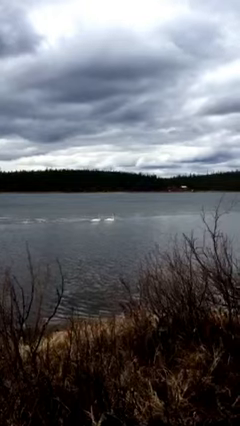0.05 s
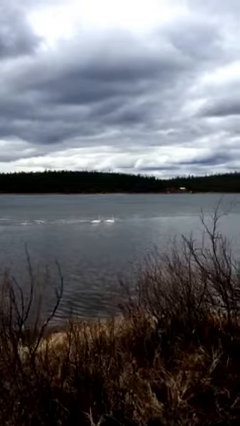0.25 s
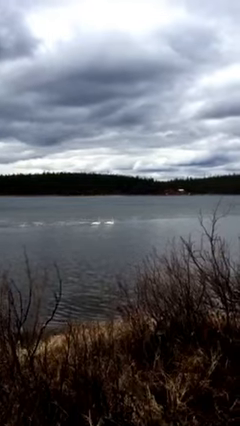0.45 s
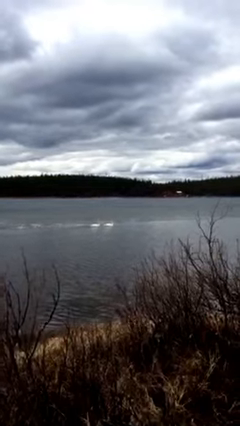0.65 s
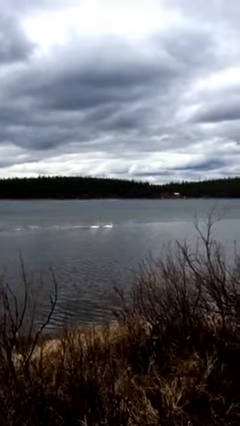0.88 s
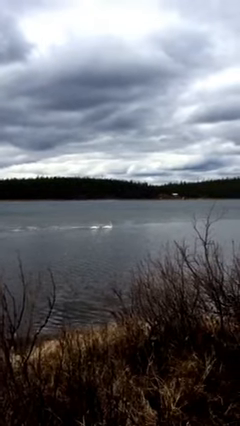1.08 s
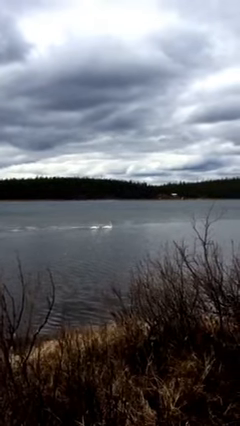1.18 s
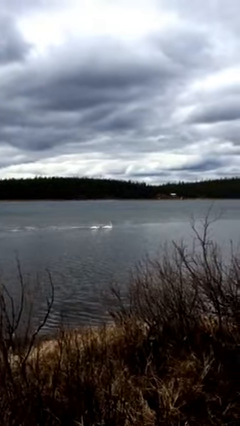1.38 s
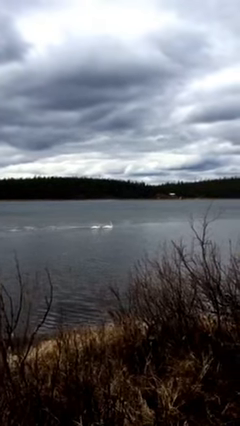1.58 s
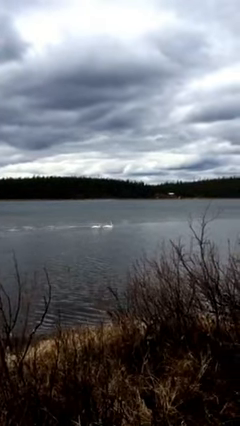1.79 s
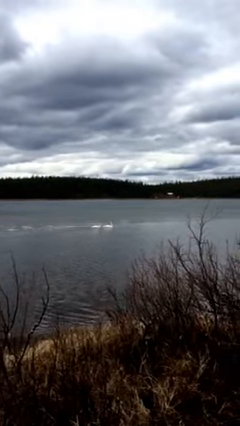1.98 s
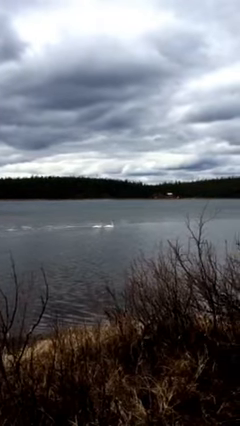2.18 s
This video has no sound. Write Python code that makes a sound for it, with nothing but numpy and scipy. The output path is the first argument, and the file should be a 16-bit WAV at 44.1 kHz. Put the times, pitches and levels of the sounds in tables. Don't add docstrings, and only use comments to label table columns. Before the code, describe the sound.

A distant swan honks once at about 1.6 seconds, barely a tenth of a second long: a low nasal start cracks and jumps to a clear higher note that dips, with a hollow ring and faint lake echo. Earlier, deep fluttering wind buffets hit the microphone from 0.2 to 0.8, strongest near 0.7; tiny bubbles trickle around 0.2-0.5. More thumps come at 1.75-2.0, with faint twig rustle over steady soft hiss.

```python
import sys
import numpy as np
from scipy import signal
from scipy.io import wavfile
from scipy.ndimage import uniform_filter1d

SR = 44100
rng = np.random.default_rng(int(sys.argv[2]) if len(sys.argv) > 2 else 0)


def dump(signal):
    limited = np.clip(np.atleast_2d(signal).T, -1, 1)
    pcm = np.round(limited * 32767).astype(np.int16)
    wavfile.write(sys.argv[1], SR, pcm)


def amplitude_ratio(level_db):
    exponent = np.asarray(level_db, float) / 20
    return 10 ** exponent


N = 99225


def evened(x):
    return x / np.sqrt(np.mean(x ** 2) + 1e-20)


def add(mix, s, sound):
    part = mix[max(round(s * SR), 0):][:len(sound)]
    part += sound[:len(part)]


def bump(t, length):
    return .5 ** ((2 * t / length) ** 2)


def resonate(x, hz, width_hz):
    turn = np.exp(2j * np.pi * np.cumsum(hz * np.ones(len(x))) / SR)
    r = np.exp(-np.pi * width_hz / SR)
    smooth = signal.lfilter([(1 - r) ** 2], [1, -2 * r, r * r], x / turn)
    return 2 * (turn * smooth).real


def voice(curve, partials):
    waver_db = .5
    s, *columns = np.transpose(curve)
    t = np.arange(s[0], s[-1], 1 / SR)
    hz, effort_db, first_db = (uniform_filter1d(np.interp(t, s, v), size=130) for v in columns)
    turns = 2 * np.pi * np.cumsum(hz) / SR
    drift = rng.standard_normal((len(partials), len(t)))
    for _ in range(2):
        drift = uniform_filter1d(drift, size=200)
    drift = waver_db * evened(drift)
    tone = np.zeros(len(t))
    for i, (multiple, db, share) in enumerate(partials):
        level = first_db if i == 0 else share * effort_db
        tone += amplitude_ratio(db + level + drift[i]) * np.sin(multiple * turns)
    return s[0], tone * signal.windows.tukey(len(t), .03)


# (time [s], pitch [Hz], effort [dB], first partial [dB])
LOW_START = [(1.5668, 324, -36, -34), (1.576, 312, -20, -14), (1.586, 301, -13, -4), (1.594, 298, -6, -3),
             (1.601, 297, 1, -1), (1.609, 293, -6, 0), (1.617, 290, -16, -4), (1.628, 290, -32, -22)]
# (multiple of the pitch, level [dB], share of the effort followed)
LOW_START_PARTIALS = [
    (1, -56, 0),
    (2, -50, 1),
    (3, -66, 1),
]
# (time [s], pitch [Hz], effort [dB], first partial [dB])
CLEAR_NOTE = [(1.6065, 392, -14, -20), (1.611, 395, -2, -6), (1.618, 397, -.5, 1), (1.63, 398.5, 0, -6),
              (1.65, 395.5, -.7, 2), (1.664, 386, -1.8, -1), (1.676, 369, -3.5, -6), (1.683, 349, -21, -2),
              (1.72, 332, -62, -24)]
# (multiple of the pitch, level [dB], share of the effort followed)
CLEAR_NOTE_PARTIALS = [
    (1, -56.5, 0),
    (2, -39.8, 1),
    (3, -62.5, .8),
    (6, -83, 5.5),
    (8, -89, 5.5),
]
# (pitch [Hz], level [dB], time to fall 60 dB [s])
WINDPIPE_TONES = [(516, -50, .09), (668, -38, .048), (664, -51, .22), (886, -50, .08), (998, -53, .06)]
# (time [s], level [dB])
BREAK_JOLTS = [
    (1.5951, -6),
    (1.6071, 0),
]


def swan():
    jolt_rise_s = .0025
    brass_s, brass_hz, brass_db, brass_t60_s = 1.611, 1280, -61, 0.098
    out = np.zeros(N)
    t = np.arange(8000) / SR
    add(out, *voice(LOW_START, LOW_START_PARTIALS))
    add(out, *voice(CLEAR_NOTE, CLEAR_NOTE_PARTIALS))
    rise = 1 - np.exp(-(t / jolt_rise_s) ** 2)
    ring = sum(amplitude_ratio(db - 60 * t / t60) * np.sin(2 * np.pi * hz * t) for hz, db, t60 in WINDPIPE_TONES)
    for s, db in BREAK_JOLTS:
        add(out, s, amplitude_ratio(db) * ring * rise)
    brass = amplitude_ratio(brass_db - 60 * t / brass_t60_s) * np.sin(2 * np.pi * brass_hz * t)
    add(out, brass_s, brass * rise)
    return out


def lake_echo(bird):
    echo_db, t60_s, delay_s, shore_s = -32, .6, .018, .1
    t = np.arange(SR // 2) / SR
    hits = rng.standard_normal(len(t)) * (rng.random(len(t)) < .2)
    fade = amplitude_ratio(-60 * t / t60_s - 8 * (t > shore_s))
    echoes = hits * fade * (t > delay_s)
    return amplitude_ratio(echo_db) * signal.fftconvolve(bird, echoes / np.linalg.norm(echoes))[:N]


# (time of peak [s], peak level [dB], ring pitch [Hz], length [s])
GUST_BUFFETS = [(0.194, -55, 82, 0.019), (0.223, -40.5, 71.7, 0.027), (0.255, -48.5, 57.5, 0.031),
                (0.281, -41, 59.8, 0.021), (0.305, -48, 55.96, .025), (0.356, -38.5, 58.9, 0.023),
                (0.399, -45, 56.3, 0.017), (0.445, -43, 61.55, 0.05), (.487, -40, 63.77, 0.024),
                (0.518, -47, 56.8, 0.029), (0.588, -43.5, 65.3, 0.045), (0.628, -40, 59, 0.018),
                (0.658, -34.5, 80.4, 0.016), (.686, -34.5, 79.5, 0.021), (0.715, -34.5, 61.1, 0.018),
                (0.74, -34, 56.2, 0.023), (0.764, -41.5, 58.4, 0.019), (0.804, -53.5, 69.2, 0.04),
                (0.858, -52, 73.4, 0.019)]
# (time of peak [s], peak level [dB], ring pitch [Hz], length [s])
LONE_BUFFETS = [(0.046, -63, 54.3, .035), (0.152, -62, 54, 0.023), (0.925, -53, 51.54, .029),
                (1.041, -53, 60.3, 0.014), (1.07, -55.5, 58.6, 0.017), (1.094, -50.5, 60, 0.017),
                (1.205, -56.5, 48.26, 0.05), (1.431, -56.5, 51.1, 0.033), (1.487, -66, 53.7, .025),
                (1.524, -66.5, 63.4, 0.015), (1.567, -68, 64.2, 0.025), (1.6, -58.5, 47.7, 0.028),
                (1.643, -61, 60, 0.026), (1.758, -47.5, 65.9, 0.025), (1.829, -52, 59.2, 0.021),
                (1.852, -41, 68.5, 0.017), (1.882, -51.5, 53.9, 0.031), (1.975, -38.5, 59.14, 0.029),
                (2.053, -64.5, 63, .027), (2.119, -57.5, 64, 0.016), (2.23, -71, 50.8, .03)]
# (time [s], peak level [dB], pitch [Hz])
SHARP_EDGES = [(.215, -74, 125), (0.359, -61.5, 134), (.625, -61, 148), (.655, -48, 120),
               (.69, -50.5, 161.4), (0.709, -45.5, 130), (0.752, -57.5, 150), (.855, -66, 145.5),
               (1.09, -69, 125), (1.5, -68.5, 169.7), (1.85, -55, 140.7), (1.968, -55.5, 150)]


def wind():
    sag_hz_per_s, tail_stretch = 280, 1.3
    flutter_db, flutter_power, flutter_hz, flutter_width_hz = -59.5, 2.07, 125, 71
    edge_s, low_cut_hz = 0.015, 40
    push, pull, edges = np.zeros(N), np.zeros(N), np.zeros(N)
    t = np.arange(-.04, .12, 1 / SR)
    stretch = np.where(t > 0, tail_stretch, 1 / tail_stretch)
    for s, db, hz, length in GUST_BUFFETS + LONE_BUFFETS:
        power = amplitude_ratio(2 * db) * bump(t, length * stretch) ** 2
        add(push, s + t[0], power)
        add(pull, s + t[0], power * (hz - sag_hz_per_s * t))
    ring_hz = (pull + 6e-9) / (push + 1e-10)
    ring = np.sqrt(push) * np.cos(2 * np.pi * np.cumsum(ring_hz) / SR)
    for s, db, hz in SHARP_EDGES:
        wave = np.cos(2 * np.pi * (rng.random() + hz * t))
        add(edges, s + t[0], amplitude_ratio(db) * bump(t, edge_s) * wave)
    flutter = evened(resonate(rng.standard_normal(N), flutter_hz, flutter_width_hz))
    strength = (push / push.max()) ** (flutter_power / 2)
    out = ring + edges + amplitude_ratio(flutter_db) * strength * flutter
    return signal.sosfilt(signal.butter(3, low_cut_hz, "high", fs=SR, output="sos"), out)


# (time [s], pitch [Hz], level [dB])
BUBBLES = [(0.169, 1600, -81), (.213, 1580, -80), (.252, 1705, -74.5), (.262, 1494, -75.5), (.3, 1650, -77),
           (.335, 1694, -79), (0.374, 1840, -78), (.432, 1930, -87), (0.477, 1740, -79)]
# (time [s], pitch [Hz], level [dB])
SHORE_RIPPLE = [
    (.13, 1580, -12),
    (.2, 1600, -10),
    (.27, 1630, 1.5),
    (.35, 1640, -3.5),
    (.45, 1820, -10),
    (.55, 1960, -16),
]


def water():
    bubble_s, ripple_db, ripple_width_hz = 0.014, -84, 250
    out = np.zeros(N)
    t = np.arange(-.05, .05, 1 / SR)
    for s, hz, db in BUBBLES:
        tone = np.sin(2 * np.pi * hz * (t + 0.61 * t ** 2))
        add(out, s + t[0], amplitude_ratio(db) * bump(t, bubble_s) * tone)
    s, hz, db = np.transpose(SHORE_RIPPLE)
    t = np.arange(s[0], s[-1], 1 / SR)
    ripple = evened(resonate(rng.standard_normal(len(t)), np.interp(t, s, hz), ripple_width_hz))
    add(out, s[0], amplitude_ratio(ripple_db + np.interp(t, s, db)) * ripple)
    return out


# (time of peak [s], pitch [Hz], width [Hz], level [dB], length [s])
TWIG_SWELLS = [
    (1.834, 2300, 900, -84.5, 0.18),
    (.68, 2300, 700, -94, .12),
    (1.547, 310, 120, -82, .1),
    (.3, 300, 300, -87, 0.27),
]


def twigs():
    t = np.arange(N) / SR
    out = np.zeros(N)
    for s, hz, width_hz, db, length in TWIG_SWELLS:
        rustle = evened(resonate(rng.standard_normal(N), hz, width_hz))
        out += amplitude_ratio(db) * bump(t - s, length) * rustle
    return out


# (pitch [Hz], level per Hz [dB])
HISS_COLOUR = [(15, -28), (25, -3.5), (64, -5), (253, -13.5), (704, -18.5), (1540, -22), (2060, -20),
               (2780, -22.5), (15500, -31)]
# (pitch [Hz], width [Hz], depth [dB])
OPENING_DIPS = [(4870, 230, 3), (7740, 430, 2.5), (10480, 590, 4.5), (14400, 2500, 2.2)]


def air():
    hiss_db, patch_db = -75, .38
    frames, hz = N // 512 + 5, np.fft.rfftfreq(2048, 1 / SR)
    a, b, patches = rng.standard_normal((3, len(hz), frames))
    patches = uniform_filter1d(patches, size=30, axis=0)
    patches = evened(uniform_filter1d(patches, size=10, axis=1))
    f, db = np.transpose(HISS_COLOUR)
    colour = np.interp(np.log(hz + 1), np.log(f + 1), db)
    for centre, width, depth in OPENING_DIPS:
        colour -= depth * np.exp(-((hz - centre) / width) ** 2)
    z = (a + 1j * b) * amplitude_ratio(colour[:, None] + patch_db * patches)
    hiss = signal.istft(z, nperseg=2048, noverlap=1536)[1]
    above = signal.istft(z * (hz[:, None] > 300), nperseg=2048, noverlap=1536)[1]
    return amplitude_ratio(hiss_db) * hiss[:N] / np.std(above)


def scene():
    bird = swan()
    return (bird + lake_echo(bird) + wind() + water() + twigs() + air())[None]


def roll_off(x):
    return signal.sosfilt(signal.butter(12, 15690, fs=SR, output="sos"), x)


def record(dry):
    top_hz = 15800
    edge = signal.firwin(401, top_hz, window=("kaiser", 6), fs=SR)
    mix = signal.oaconvolve(dry, edge[None], "same")
    return roll_off(mix)


dry = scene()
out = record(dry)
dump(out)
```